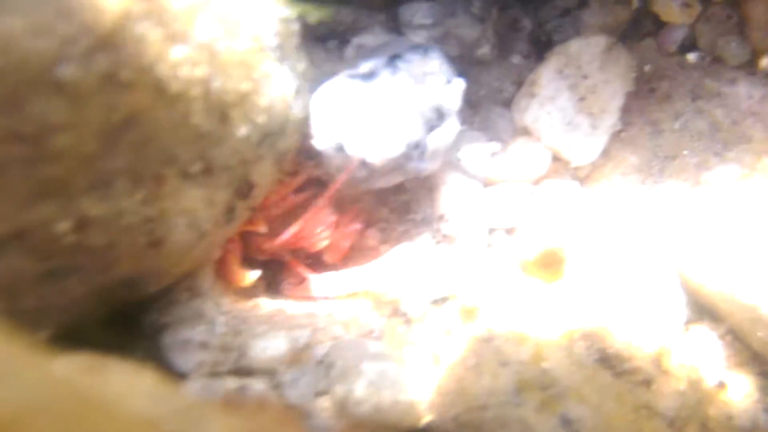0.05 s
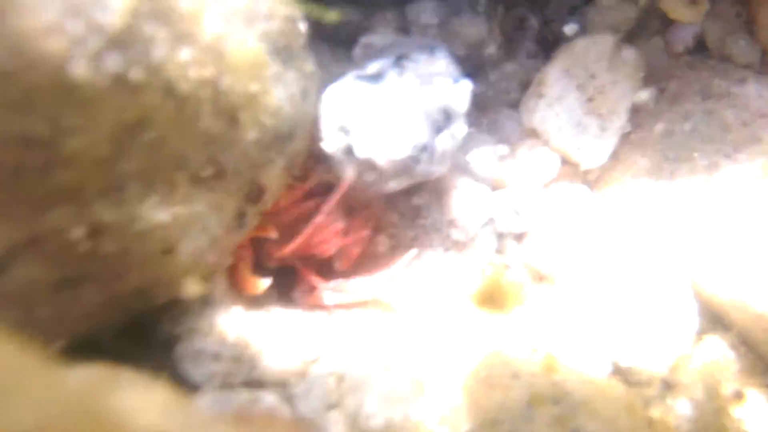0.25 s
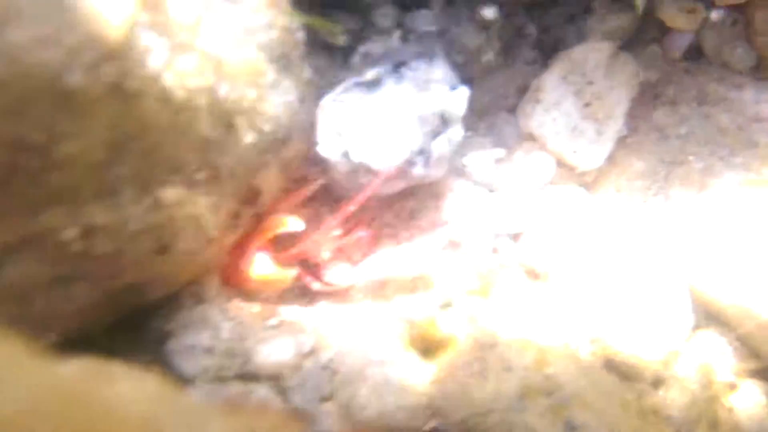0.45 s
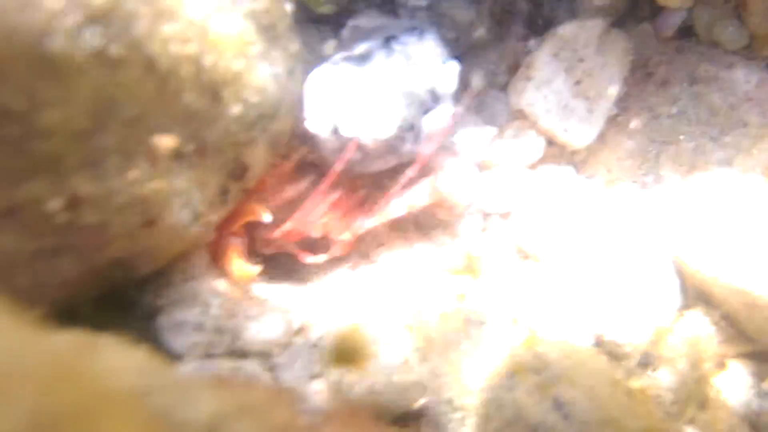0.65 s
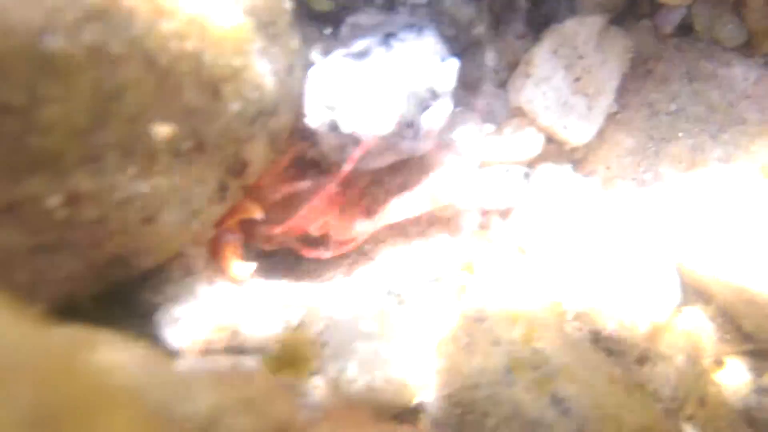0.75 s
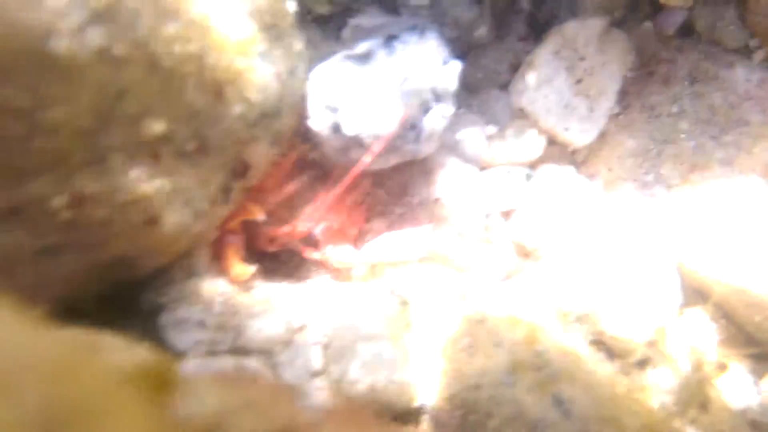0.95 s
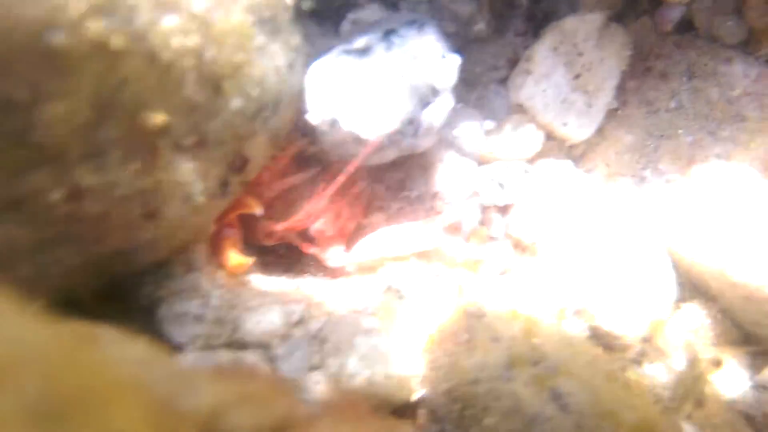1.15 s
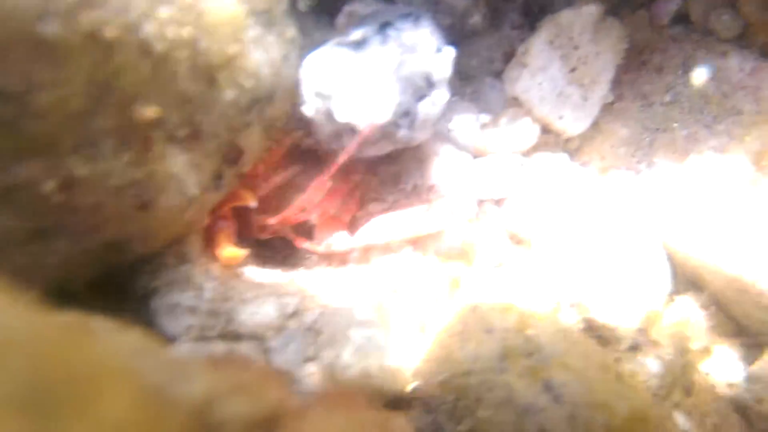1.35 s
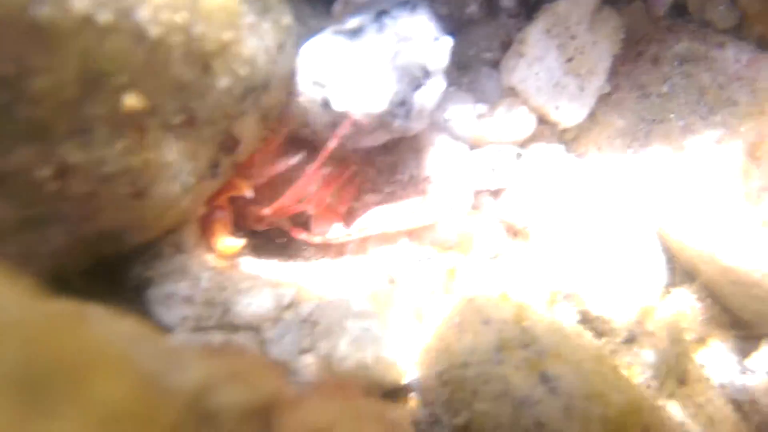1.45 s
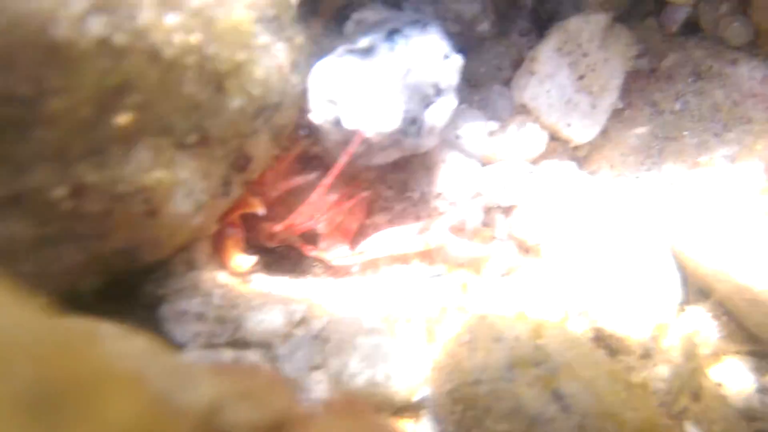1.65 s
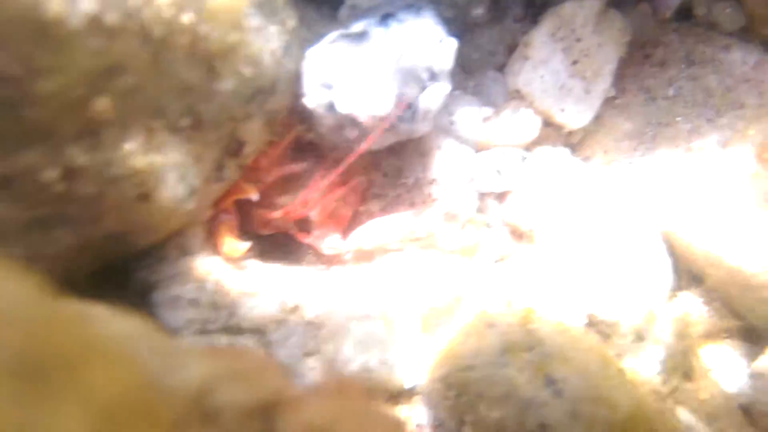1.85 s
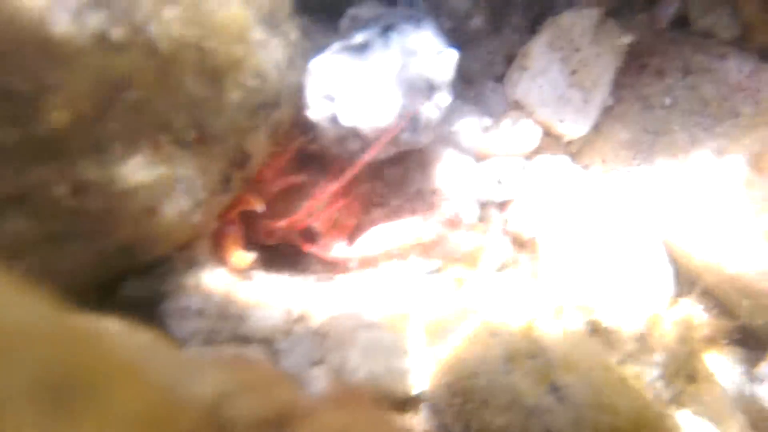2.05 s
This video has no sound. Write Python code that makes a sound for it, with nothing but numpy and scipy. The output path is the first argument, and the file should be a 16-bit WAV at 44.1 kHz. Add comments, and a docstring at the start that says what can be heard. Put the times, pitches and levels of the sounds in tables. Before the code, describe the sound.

Wind rushes outdoors, dull and distant at first, over a light rumble and faint hiss. From about 0.2 to 0.5 seconds a flurry buffets the microphone with flutter, low thumps and small crackles, hardest near 0.3 seconds. The rush, slightly hollow and mostly on the right, grows louder and brighter until about 1.3 seconds, then holds. A second flurry thumps and crackles from 1.6 to 1.9 seconds.

```python
"""A broad rush of air swells and brightens, outdoors, with a stereo microphone close to the ground.
The rush sits mostly on the right. Two flurries of wind hit the microphone ports directly,
with flutter, low thumps and a few crackles. Underneath lie a light draught's rumble and the
microphone's hiss. The hardest thump makes the limiter duck everything for a moment."""
import sys
import numpy as np
from scipy import signal
from scipy.fft import rfft, irfft, next_fast_len
from scipy.io import wavfile
from scipy.ndimage import uniform_filter1d, minimum_filter1d, map_coordinates

SR = 44100
rng = np.random.default_rng(int(sys.argv[2]) if len(sys.argv) > 2 else 0)


def inscribe(sig):
    """Save sig as 16-bit PCM at rate SR to the path in sys.argv[1].

    A 1-D sig is mono; a 2-D sig holds one channel per row.
    Samples are clipped to [-1, 1] before scaling.
    """
    pcm = np.round(np.clip(np.atleast_2d(sig).T, -1, 1) * 32767)
    wavfile.write(sys.argv[1], SR, pcm.astype(np.int16))


N = 92610
TIME = np.arange(N) / SR

# The rush coming closer. Each row: time in seconds, swell (0 is far and dull, 1 is full).
RUSH_SWELL = [(0, -0.012), (.2, -0.15), (.45, 0.24), (.65, 0.45), (.85, 0.71), (1.08, 0.86), (1.35, 1.01),
              (1.7, 1.02), (2.1, 1.05)]
# The rush far off and at full swell. Each row: frequency in Hz, spectral level in dB.
FAR_SPECTRUM = [(40, 2.5), (170, -10), (330, 2), (500, -12.5), (700, -10.5), (900, -26), (1400, -23.5),
                (2000, -39.5), (3000, -49.5), (6000, -64.5), (16000, -80)]
FULL_SPECTRUM = [(40, -7), (220, -0.5), (480, 0), (880, -1), (1050, -8.5), (1220, -3), (1540, -5),
                 (1850, -19.5), (2300, -22.5), (2850, -35.5), (3400, -29.5), (4000, -36), (6000, -51.5),
                 (16000, -82.5)]
# Its low, hollow resonance. Each row: time in seconds, centre in Hz, level in dB.
HOLLOW_TONE = [(0, 297, -52.5), (.18, 313, -40.5), (.5, 300, -41), (.7, 327, -44.5), (.85, 390, -39.5),
               (1.1, 400, -50.5), (1.4, 454, -53)]
# The shaded left port against the right. Each row: frequency in Hz, gain in dB.
LEFT_SHADE = [(100, -17.5), (400, -17.5), (850, -13), (1100, -12.5), (1500, -11.5), (3000, -8.5)]
# The left port's lead over the right. Each row: frequency in Hz, phase in radians.
LEFT_LEAD = [(200, 1.5), (800, -0.8), (1050, 1.4), (1300, 3.5), (1700, 4), (2200, 8)]


def rush(full_db=-36.5, hollow_q=2.2):
    """Air moving on the right grows louder and brighter while its hollow tone rises and fades."""
    def broad(hz, s):
        swell = np.interp(s, *np.transpose(RUSH_SWELL))
        far, full = along(FAR_SPECTRUM, hz), along(FULL_SPECTRUM, hz)
        blend_db = swell * full + (1 - swell) * far
        return amp(full_db + blend_db) / np.sqrt(np.mean(amp(full) ** 2))

    def hollow(hz, s):
        when, centre_hz, db = np.transpose(HOLLOW_TONE)
        ratio = (hz + 1) / np.interp(s, when, centre_hz)
        peak = 1 / (1 + (hollow_q * (ratio - 1 / ratio) / 2) ** 2) ** 2
        return amp(np.interp(s, when, db)) * peak / np.sqrt(np.mean(peak ** 2, axis=0))

    right = moving_noise(broad, patchy_db=1.79) + moving_noise(hollow, patchy_db=2.0)
    left = filtered(right, lambda hz: amp(along(LEFT_SHADE, hz)) * np.exp(1j * along(LEFT_LEAD, hz)))
    return np.array([left, right])


# Wind right on the microphone. Each row: middle and half length in seconds,
# left and right level in dB, upper edge in Hz.
PORT_GUSTS = [(0.225, 0.034, -34.5, -32, 158), (0.286, 0.0058, -16.5, -14.5, 303),
              (0.336, 0.021, -15.5, -26.5, 179), (.382, 0.013, -24, -38.5, 130),
              (0.442, 0.0078, -16.5, -28.5, 160), (0.471, 0.012, -14, -21.5, 324),
              (0.5, 0.028, -24, -24.5, 64), (0.713, 0.02, -54, -36.5, 408), (1.658, 0.022, -16.5, -27, 128),
              (1.737, 0.054, -25.5, -36.5, 80.2), (1.905, 0.023, -22.5, -18.5, 120)]


def gusts(flutter_db=0.5):
    """Short puffs of fluttering turbulence, unrelated at the two ports."""
    out = np.zeros((2, N))
    for middle, half_length, left_db, right_db, edge_hz in PORT_GUSTS:
        envelope = np.exp(-((TIME - middle) / half_length) ** 2 / 2)
        for port, db in enumerate((left_db, right_db)):
            push = rng.standard_normal(N) * envelope * amp(flutter_db * wobble(150))
            flow = band(push, low_hz=45.6, low_order=2, high_hz=edge_hz, high_order=3.22)
            out[port] += amp(db) * unit(flow) * np.sqrt(np.mean(envelope ** 2))
    return out


# Single eddies striking the microphone. Each row: time in seconds, left and right peak in dB,
# build-up and collapse time constants in seconds.
EDDY_THUMPS = [(0.2374, 0, -37, 0.0023, 0.0012), (0.2358, -39.5, -10, .0008, 0.00044),
               (0.3027, 1, -26, 0.003, 0.00043), (0.3164, 8.5, -9, .005, 0.00081),
               (.3303, -2, -33, 0.00074, 0.00027), (0.4715, -1.5, -30, 0.006, 0.00029),
               (0.4956, -2.5, -26, 0.011, .0008), (1.5488, -31, -12.5, 0.0014, 0.0012),
               (1.638, -5, -44, 0.0027, 0.0013), (1.671, -20.5, -11, 0.0017, 0.00025),
               (1.688, -20, 1.5, 0.006, 0.0007), (1.729, -8.5, -38, 0.013, 0.00025),
               (1.8976, 0.5, -42, 0.0015, 0.0012), (1.9085, -4, -24, 0.0029, 0.00065)]


def thumps():
    """An eddy pulls at one port, pushes at the other and collapses; bass cut and cavity make it thump."""
    def port_response(hz):
        bass_cut = -hz ** 2 * resonance(hz, centre_hz=59, q=1.22)
        cavity = resonance(hz, centre_hz=520, q=1.5)
        return bass_cut * cavity

    out = np.zeros((2, N))
    for when, left_db, right_db, build, collapse in EDDY_THUMPS:
        suction = -np.exp(-np.logaddexp((when - TIME) / build, (TIME - when) / collapse))
        thump = filtered(suction, port_response)
        out += np.outer([amp(left_db), -amp(right_db)], thump / np.abs(thump).max())
    return out


# The ports overdriven by wind. Each row: time in seconds, left and right level in dB, upper edge in Hz.
PORT_CRACKLES = [(.282, -28.5, -41.5, 2135), (.288, -41.5, -36.5, 1500), (0.307, -47, -51.5, 12000),
                 (0.314, -13.5, -30.5, 523), (0.318, -45.5, -49, 8000), (.331, -23.5, -41.5, 850),
                 (0.371, -31.5, -44, 1710), (.448, -19, -31.5, 516), (0.467, -30, -37.5, 1410),
                 (1.645, -38, -48, 3170), (1.645, -15, -37, 555), (1.671, -23, -27.5, 716),
                 (1.6866, -15.5, -18.5, 620), (1.897, -30.5, -39.5, 1700)]


def crackles(fade_s=0.0013):
    """Tiny bursts where the flow tears at a port."""
    out = np.zeros((2, N))
    for when, left_db, right_db, edge_hz in PORT_CRACKLES:
        envelope = np.exp(-np.abs(TIME - when) / fade_s)
        for port, db in enumerate((left_db, right_db)):
            burst = rng.standard_normal(N) * envelope
            grit = band(burst, low_hz=146, low_order=1, high_hz=edge_hz, high_order=3.1)
            out[port] += amp(db) * unit(grit) * np.sqrt(np.mean(envelope ** 2))
    return out


# The draught across the microphone. Each row: time in seconds, gain in dB.
DRAUGHT_STRENGTH = [(0, -0.5), (.6, 3), (1, -0.5), (1.4, -2), (2.05, 3.5)]
# Its rumble. Each row: frequency in Hz, spectral level in dB.
RUMBLE_SPECTRUM = [(20, -6), (45, 7), (80, -3), (160, -17.5), (400, -28), (2000, -60)]


def draught(left_db=-48.5, right_db=-55.5, waver_db=3.0):
    """A light draught rumbles on both ports, wavering separately at each."""
    strength_db = np.interp(TIME, *np.transpose(DRAUGHT_STRENGTH))
    return np.array([amp(db + strength_db + waver_db * wobble(3)) * noise(RUMBLE_SPECTRUM)
                     for db in (left_db, right_db)])


# The microphone's own noise, left and right. Each row: frequency in Hz, spectral level in dB.
LEFT_HISS_SPECTRUM = [(100, -1.5), (350, -7.5), (550, -4), (1100, -9.5), (1900, -7.5), (2700, -11.5),
                      (4000, -19), (4700, -26.5), (7000, -30.5), (15500, -33.5)]
RIGHT_HISS_SPECTRUM = [(100, 2.5), (1500, -5), (2600, -4), (4500, -8.5), (7000, -11), (15500, -14)]


def hiss(left_db=-53.5, right_db=-66):
    """Each channel hisses steadily, the left louder and duller."""
    return np.array([amp(left_db) * noise(LEFT_HISS_SPECTRUM),
                     amp(right_db) * noise(RIGHT_HISS_SPECTRUM)])


def amp(db):
    """Decibels to gain."""
    return 10 ** (np.asarray(db) / 20)


def unit(x):
    """Scale to rms 1."""
    return x / np.sqrt(np.mean(x ** 2) + 1e-20)


def along(points, hz):
    """Interpolate (Hz, value) points on a log frequency axis."""
    point_hz, values = np.transpose(points)
    return np.interp(np.log(hz + 1), np.log(point_hz + 1), values)


def wobble(rate):
    """A smooth random curve, rate knots a second."""
    return map_coordinates(rng.standard_normal(N // 20), [TIME * rate], mode="wrap")


def resonance(hz, centre_hz, q):
    """Second-order low-pass response."""
    return 1 / (1 - (hz / centre_hz) ** 2 + 1j * hz / (centre_hz * q))


def filtered(x, response):
    """Pass x through a complex frequency response."""
    size = next_fast_len(N + SR // 2)
    return irfft(rfft(x, size) * response(np.fft.rfftfreq(size, 1 / SR)), size)[..., :N]


def band(x, low_hz, low_order, high_hz, high_order):
    """Band-pass whose skirts fall 6 dB an octave per order."""
    return filtered(x, lambda hz: (hz / np.hypot(hz, low_hz)) ** low_order
                    / np.hypot(1, (hz / high_hz) ** high_order))


def noise(spectrum):
    """Coloured noise of rms 1."""
    return unit(filtered(rng.standard_normal(N), lambda hz: amp(along(spectrum, hz))))


def moving_noise(gain, patchy_db, size=1024):
    """Noise coloured by gain(Hz, s), with patches of random level."""
    hz, s, white = signal.stft(rng.standard_normal(N), SR, nperseg=size)
    patches = uniform_filter1d(rng.standard_normal(white.shape), size=5, axis=0)
    patches = unit(uniform_filter1d(patches, size=6, axis=1))
    coloured = white * gain(hz[:, None], s) * amp(patchy_db * patches)
    return signal.istft(coloured, SR, nperseg=size)[1][:N]


def limiter(x, ceiling_db, release_db_per_s, size=129):
    """One gain for both channels: drops at once on a peak and climbs back steadily."""
    peak_db = 20 * np.log10(np.abs(x).max(axis=0) + 1e-9)
    over_db = np.maximum(peak_db - ceiling_db, 0)
    climb_db = release_db_per_s * TIME
    gain_db = climb_db - np.maximum.accumulate(over_db + climb_db)
    return x * amp(uniform_filter1d(minimum_filter1d(gain_db, size), size))


def scene():
    """The wind at the two ports, over the microphone's hiss."""
    return rush() + gusts() + thumps() + crackles() + draught() + hiss()


def record(dry, top_hz=16000):
    """The recorder limits peaks and keeps nothing above its band limit."""
    limited = limiter(dry, ceiling_db=-0.9, release_db_per_s=72)
    return filtered(limited, lambda hz: hz < top_hz)


dry = scene()
out = record(dry)
inscribe(out)
```